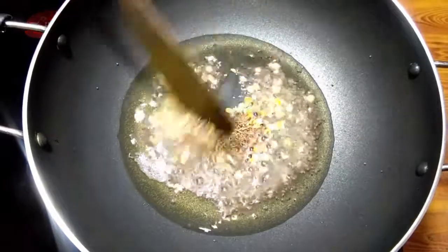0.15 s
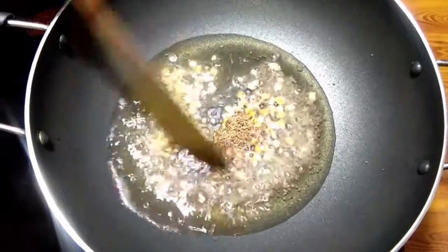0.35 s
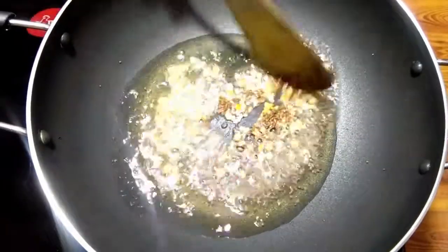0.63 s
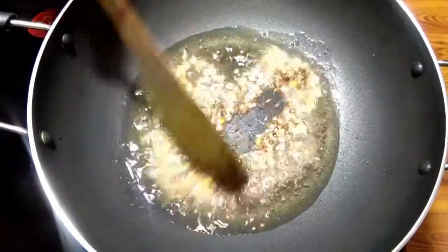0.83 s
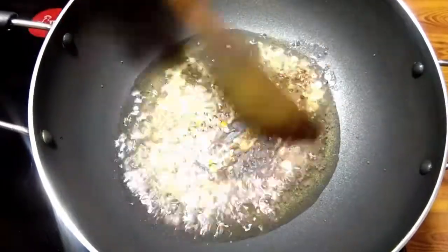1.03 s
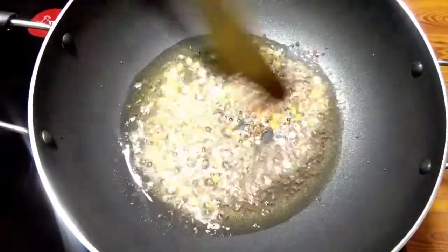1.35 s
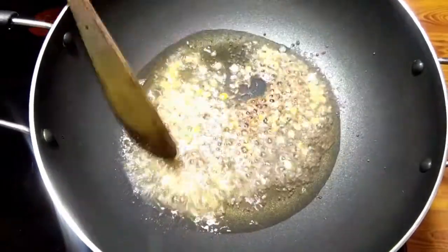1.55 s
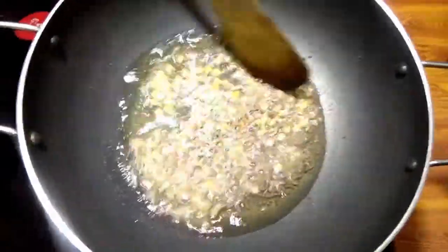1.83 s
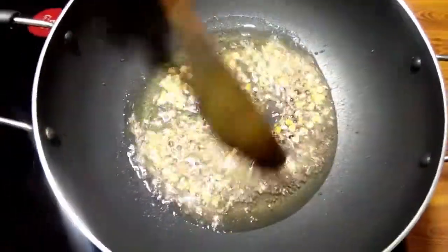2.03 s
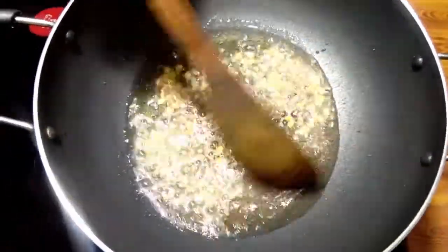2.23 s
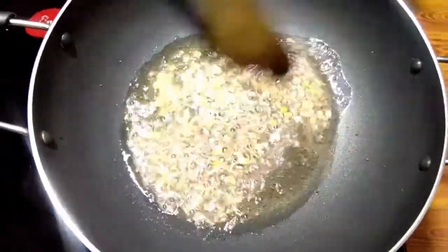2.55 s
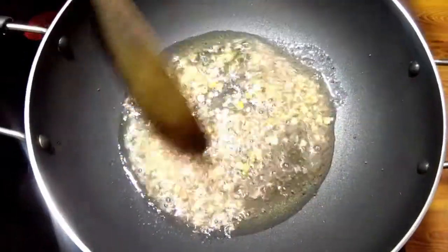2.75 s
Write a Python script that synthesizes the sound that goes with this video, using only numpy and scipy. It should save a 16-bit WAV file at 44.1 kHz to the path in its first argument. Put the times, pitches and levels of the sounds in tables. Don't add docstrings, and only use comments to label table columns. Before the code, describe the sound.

Frying seeds crackle and pop loudly over a fine sizzle, with light wooden spatula knocks on the pan

```python
import sys
import numpy as np
from scipy import signal
from scipy.fft import rfft, irfft, next_fast_len
from scipy.io import wavfile
from scipy.ndimage import map_coordinates

SR = 44100
rng = np.random.default_rng(int(sys.argv[2]) if len(sys.argv) > 2 else 0)


def voltage_ratio(decibels):
    exponent = np.asarray(decibels, float) / 20
    return 10 ** exponent


def generate_wav(signal):
    frames = np.transpose(np.atleast_2d(signal))
    scaled = np.clip(frames, -1, 1) * 32767
    pcm = np.round(scaled).astype(np.int16)
    wavfile.write(sys.argv[1], SR, pcm)


N = 127890


def unit(x):
    return x / np.sqrt(np.mean(x ** 2) + 1e-20)


def along(points, hz):
    f, v = np.transpose(points)
    return np.interp(np.log(hz + 1), np.log(f + 1), v)


def curve(rows):
    return np.interp(np.arange(N) / SR, *np.transpose(rows))


def wobble(rate):
    knots = rng.standard_normal(int(N * rate / SR) + 4)
    return map_coordinates(knots, [np.arange(N) * rate / SR])


def filtered(x, response):
    m = next_fast_len(N + SR // 2)
    spectrum = rfft(x, m) * response(np.fft.rfftfreq(m, 1 / SR))
    return irfft(spectrum, m)[:N]


def resonances(f, peaks):
    total = 0
    for k, (center, width, db) in enumerate(peaks):
        damping = 1j * f * width
        total = total + (-1) ** k * voltage_ratio(db) * damping / (center * center - f * f + damping)
    return total


def placed(s, waves):
    at = np.round(np.clip(s, 0, None) * SR).astype(int)[:, None] + np.arange(waves.shape[1])
    return np.bincount(at.ravel(), waves.ravel(), N + SR)[:N]


def swell(s, db, rise_s):
    u = np.arange(SR // 8) / SR / rise_s
    return placed(s, voltage_ratio(db)[:, None] * u * np.exp(1 - u))


def bubbles(s, gain, hz, cycles, rise_s):
    t = np.arange(260) / SR
    hz = np.clip(hz, 1500, 0.4 * SR)[:, None]
    u = t * hz / cycles
    shape = (1 - np.exp(-t / rise_s)) * np.exp(-u - u ** 2 / 2)
    shape = shape / shape.max(axis=1, keepdims=True)
    note = np.sin(2 * np.pi * hz * t * (1 + 0.0027 * u))
    return placed(s, gain[:, None] * shape * note)


def grains(per_s, hz, spread, cycles):
    r = rng.random((4000, 2))[:int(per_s * N / SR)]
    detune = rng.standard_normal(4000)[:len(r)]
    sizes_db = -8.5 * np.log(r[:, 1] + 0.05)
    pitch = hz * np.exp(spread * detune)
    return unit(bubbles(r[:, 0] * N / SR, voltage_ratio(sizes_db), pitch, cycles, rise_s=0.00011))


def pops():
    # start in seconds, peak level in dB, bubble pitch in Hz, crack level
    # over the peak in dB.
    steam_pops = [(0.085, -11.5, 2550, -26), (0.1251, -14, 3360, -8), (0.192, -19.5, 3010, -1.5),
                  (0.221, -6.5, 3340, -17), (0.285, -22.5, 2560, -14), (0.327, -13, 2470, -11),
                  (0.3465, -15, 3080, -0.5), (0.3985, -22, 5600, -6), (0.4198, -10.5, 3740, -21),
                  (0.4576, -12, 3200, -35), (0.4804, -16, 3420, -16), (0.5241, -19.5, 3300, -4),
                  (0.6491, -8, 2930, -11.5), (0.702, -11, 3220, -10.5), (0.7641, -4.5, 3920, -36),
                  (0.7667, -2.5, 3200, -30), (0.7716, -30, 3300, -10), (0.8019, -11, 3160, -4),
                  (0.8266, -10, 2430, -16.5), (0.8387, -8.5, 3440, -44), (0.8853, -9, 2710, -14.5),
                  (0.9308, -10.5, 3700, -37), (0.9755, -17, 2730, -22), (0.987, -11, 3660, -18),
                  (1.0046, -4.5, 3130, -21),
                  (1.031, -9, 3300, -16), (1.0453, -16.5, 5160, -25), (1.0533, -16.5, 3020, -11),
                 (1.087, -12.5, 3300, -21), (1.1245, -13, 3200, -16.5), (1.1456, -11.5, 2970, -18),
                 (1.1507, -19.5, 5340, -23), (1.188, -5.5, 3020, -18), (1.2028, -14, 2230, -19),
                 (1.2116, -11.5, 2860, -48), (1.268, -16, 6100, -7), (1.279, -14, 2820, -34),
                 (1.3213, -18.5, 2480, -10), (1.3464, -14, 3600, -14), (1.3814, -6.5, 2480, -15),
                 (1.3894, -11, 4030, -13.5), (1.4533, -7, 3330, -8.5), (1.5276, -6.5, 3950, -20),
                 (1.5587, -4, 3300, -24), (1.5646, -15, 2770, -31), (1.5822, -11.5, 3500, -12),
                 (1.6004, -14.5, 3100, -14.5), (1.6495, -23, 4500, -32), (1.7301, -10.5, 3670, -20),
                 (1.7473, -19.5, 2340, -22),
                  (1.7515, -22, 2900, 0.5), (1.7824, -16, 3340, 0), (1.814, -14.5, 3230, -15),
                   (1.857, -19, 2190, -21), (1.8771, -9.5, 4310, -32), (1.9263, -4, 3480, -21),
                   (2.0091, -24.5, 3200, 6.5), (2.0918, -15, 3600, -14.5), (2.1433, -15.5, 3150, 1.5),
                   (2.2031, -17, 3220, -17), (2.2301, -4, 3750, -23.5), (2.313, -8.5, 3530, -20),
                   (2.364, -24, 2200, -21), (2.3739, -15, 3860, -27), (2.3801, -12, 3350, -39),
                   (2.413, -16.5, 2600, -28), (2.4294, -14.5, 3060, -6), (2.4541, -14, 3200, -5),
                   (2.4763, -16.5, 3470, -11.5), (2.571, -17.5, 3100, -5), (2.6262, -18, 3660, -21),
                   (2.7094, -19.5, 2760, -6), (2.7463, -20, 5400, -24), (2.825, -34, 2830, 2),
                   (2.86, -22, 3680, -14)]
    # start in seconds, level in dB.
    surges = [
        (.13, -48),
        (.355, -46),
        (.66, -42),
        (0.808, -41),
        (1.015, -41),
        (1.39, -67),
        (1.792, -39.5),
    ]
    # center in Hz, width in Hz, level in dB.
    crack_color = [(3640, 4350, -0.5), (10010, 2940, 0.5), (14000, 12600, -9.5)]
    s, db, hz, crack_db = np.transpose(steam_pops)
    note = bubbles(s, voltage_ratio(db - 2), hz, cycles=3.1, rise_s=0.0002)

    t = np.arange(SR // 8) / SR
    crack_t60_s, spray_s = 0.0038, 0.046
    decay = voltage_ratio(3.5 - 60 * t / crack_t60_s) + voltage_ratio(-23) * np.exp(-t / spray_s)
    burst = placed(s, voltage_ratio(db + crack_db)[:, None] * decay)
    surge_s, surge_db = np.transpose(surges)
    burst = burst + swell(surge_s, surge_db, rise_s=0.0086) * voltage_ratio(4 * wobble(250))
    crack = filtered(burst * rng.standard_normal(N), lambda f: resonances(f, crack_color))

    spatter = swell(s, db - 33, rise_s=0.01) * grains(1350, 3300, spread=0.14, cycles=6)
    return note + crack + spatter


def small_pops():
    # start in seconds, peak level in dB, pitch in Hz.
    small_bubbles = [(0.0002, -17.5, 2620), (0.1077, -20, 2940), (0.1187, -21, 2900), (0.1754, -33, 6540),
                     (0.2202, -24, 4800), (0.244, -32, 3140), (0.2575, -26, 4570), (0.3067, -24, 2640),
                     (0.3282, -17, 3510), (0.3805, -23.5, 3010), (0.4441, -24, 2360), (0.4458, -25, 5400),
                     (0.5712, -25.5, 3900), (0.6093, -32, 4730), (0.6255, -23.5, 4000), (0.677, -24, 2650),
                     (0.7015, -23, 6700), (0.7178, -26, 2540), (0.7186, -29, 6400), (0.727, -23, 3240),
                     (0.801, -20.5, 5530), (0.8263, -18.5, 4500), (0.8386, -23, 2000), (0.8876, -26, 5920),
                     (0.9746, -30, 5230), (0.9798, -33, 5500), (1.0041, -17.5, 5560), (1.0183, -23, 2800),
                     (1.0386, -20, 3300), (1.0443, -28, 3120), (1.0517, -26, 4820), (1.2028, -20.5, 3600),
                     (1.2603, -30, 5260), (1.2628, -18, 3060), (1.2676, -22, 3480), (1.331, -30, 5600),
                     (1.3354, -25, 3100), (1.352, -26.5, 4740), (1.3634, -22, 5060), (1.3895, -23, 3050),
                     (1.3884, -24.5, 6410), (1.5291, -20, 2150), (1.5368, -19, 2970), (1.5369, -20, 5400),
                     (1.5651, -24, 2900), (1.794, -26.5, 9150), (1.8214, -22.5, 4580), (1.9188, -21, 4130),
                     (1.94, -25, 4500), (2.1431, -20.5, 9120), (2.2925, -29.5, 4800), (2.3634, -31.5, 7050),
                     (2.4157, -21, 2860), (2.509, -30.5, 7800), (2.5374, -22.5, 3560),
                     (2.7461, -23.5, 2930)]
    s, db, hz = np.transpose(small_bubbles)
    cycles = 5.5 * np.sqrt(hz[:, None] / 3000)
    return bubbles(s, voltage_ratio(db), hz, cycles, rise_s=0.0003)


def snaps():
    # start in seconds, peak level in dB.
    dry_hulls = [
        (.1254, -26),
        (.661, -20),
        (1.4532, -30),
        (1.6004, -39),
        (1.7512, -24),
        (1.7822, -6),
        (2.0088, -20),
        (2.1433, -22),
        (2.825, -22),
    ]
    # center in Hz, width in Hz, level in dB.
    snap_color = [(9300, 2000, -2), (13800, 3500, 0), (16300, 1200, 3)]
    s, db = np.transpose(dry_hulls)
    t = np.arange(400) / SR
    t60_s = 0.005
    noise = rng.standard_normal((len(s), len(t)))
    burst = placed(s, voltage_ratio(db[:, None] - 60 * t / t60_s) * noise)
    return filtered(burst, lambda f: resonances(f, snap_color))


def splits():
    # start in seconds, peak level in dB.
    split_hulls = [(0.348, -24), (0.701, -27.5), (1.0047, -16.5), (1.39, -26), (1.4535, -18), (1.749, -33),
                   (1.7836, -18), (.766, -40), (.803, -25.5), (.827, -25), (1.836, -27.5), (2.007, -34.5),
                   (2.141, -17)]
    s, db = np.transpose(split_hulls)
    push_s = 0.00031
    u = np.arange(400) / SR / push_s
    return placed(s, voltage_ratio(db)[:, None] * (1 - 0.37 * u) * np.exp(-u))


def sizzle():
    # time in seconds, frying strength in dB.
    frying = [(0, -40), (.3, -38.5), (.6, -41.5), (.82, -37.5), (1.1, -38), (1.4, -36.5), (1.66, -41),
              (2.1, -41.5), (2.36, -39), (2.6, -41), (2.9, -40)]
    # frequency in Hz, level in dB per Hz.
    hiss_color = [(700, -16), (1300, 2.5), (2170, 9.5), (3400, 11.5), (6000, 4), (9300, -2.5), (12000, -13),
                  (15000, -20)]
    hiss_flutter = voltage_ratio(1.5 * wobble(40) + wobble(8))
    crackle_flutter = voltage_ratio(2.5 * wobble(25))
    tick_flutter = voltage_ratio(2 * wobble(20))
    noise = filtered(rng.standard_normal(N), lambda f: voltage_ratio(along(hiss_color, f)))
    hiss = voltage_ratio(-4) * unit(hiss_flutter * noise)
    crackle = voltage_ratio(-6.5) * crackle_flutter * grains(1000, 3200, spread=0.22, cycles=5.0)
    ticks = voltage_ratio(-18.5) * tick_flutter * grains(1000, 9000, spread=0.23, cycles=2.7)
    return voltage_ratio(curve(frying)) * np.array([hiss, crackle + ticks])


def spatula():
    # start in seconds, level in dB, level of the
    # low modes in dB.
    pan_hits = [
        (.1068, -10.5, -4),
        (.626, -25, -40),
        (.648, -20.5, -22),
        (.676, -23, -35),
        (.838, -16.5, -25.5),
        (2.092, -26.5, -18),
        (2.35, -31, -12.5),
        (2.412, -21.5, -21),
    ]
    # frequency in Hz, level in dB, t60 in seconds.
    pan_modes = [(173, -13, 0.25), (541, -11, 0.1), (725, -3, 0.2), (767, -5, 0.1), (838, -8, .08),
                 (1236, -15, 0.12), (1360, -1, 0.1), (1400, -4, 0.09), (1478, -5, .11), (1757, -9, 0.12),
                 (1803, -9, .13), (2217, -12, .07)]
    # time in seconds, level in dB.
    strokes = [(0, -36), (.1, -51), (.3, -55.5), (.36, -54.5), (.39, -50.5), (.47, -48), (.55, -59),
               (.63, -60), (1.6, -63), (1.67, -53.5), (1.75, -60)]
    # center in Hz, width in Hz, level in dB.
    wood_modes = [(141, 68, 2), (640, 330, -5)]
    # frequency in Hz, level in dB, t60 in seconds.
    old_ring = [(563, -38, 0.32), (1300, -54, 0.5), (1696, -41, 0.57)]
    t = np.arange(SR // 3) / SR

    rings = []
    for s, db, low_db in pan_hits:
        ring = 0
        for hz, level, t60 in pan_modes:
            lowness = np.clip(np.log2(1800 / hz), 0, 1)
            ring = ring + voltage_ratio(level + low_db * lowness - 60 * t / t60) * np.sin(2 * np.pi * hz * t)
        thud = 0.8 * voltage_ratio(low_db - 60 * t / 0.0079) * np.sin(2 * np.pi * 1150 * t)
        rings.append(voltage_ratio(db) * (ring / 3 + thud))
    rings = filtered(np.array(rings), lambda f: 1j * f / (100 + 1j * f))[:, :len(t)]
    s, db, low_db = np.transpose(pan_hits)
    ringing = placed(s, rings)
    rattle_t60_s = 0.14
    rattle = placed(s, voltage_ratio((db + low_db)[:, None] - 5 - 60 * t / rattle_t60_s))

    rub = rng.standard_normal((2, N)) * voltage_ratio(1.5 * wobble(70))
    damped_modes = [(hz, 6.4 / t60, db) for hz, db, t60 in pan_modes]
    steel = unit(filtered(rub[0], lambda f: resonances(f, damped_modes)))
    wood = 1.37 * unit(filtered(rub[1], lambda f: resonances(f, wood_modes)))
    scrape = voltage_ratio(curve(strokes) - 1) * (steel + wood)

    linger = sum(voltage_ratio(level - 60 * t / t60) * np.sin(2 * np.pi * hz * t) for hz, level, t60 in old_ring)
    return np.pad(linger, (0, N - len(t))) + ringing + scrape + rattle * steel


def kitchen():
    # frequency in Hz, level in dB per Hz.
    rumble_color = [(15, -68), (25, -1), (134, 8.5), (220, -16), (368, 0.5), (476, -38), (615, -5),
                    (1500, 0), (1950, -46), (3300, -120)]
    level = voltage_ratio(-63.5 + 0.61 * wobble(8.1))
    return level * unit(filtered(rng.standard_normal(N), lambda f: voltage_ratio(along(rumble_color, f))))


def room(x):
    # frequency in Hz, t60 in seconds.
    wall_decay = [(300, 0.32), (3000, 0.18), (12000, 0.13)]
    hz, t, z = signal.stft(rng.standard_normal(SR // 2), SR, nperseg=256)
    fade = voltage_ratio(-60 * t / along(wall_decay, hz)[:, None])
    tail = signal.istft(z * fade, SR, nperseg=256)[1]
    delayed = np.pad(x, (300, 0))
    return signal.fftconvolve(delayed, tail / np.linalg.norm(tail))[:N]


def scene():
    # center in Hz, width in Hz, level in dB.
    bowl_modes = [(2540, 67, -3), (3220, 39, -5.5), (5940, 2300, 0), (9750, 2000, -6)]
    hiss, crackle = sizzle()

    def bowl(f):
        echo_s = 0.0021
        body = 1 + sum(resonances(f, [peak]) for peak in bowl_modes)
        return body * (1 + voltage_ratio(-10) * np.exp(-2j * np.pi * f * echo_s))

    bursts = filtered(pops() + small_pops() + crackle, bowl)
    near = bursts + splits() + spatula() + snaps()
    return (near + voltage_ratio(-15.5) * room(near) + hiss + kitchen())[None]


def low_pass(x):
    return signal.sosfilt(signal.butter(12, 17000, fs=SR, output="sos"), x)


def record(dry):
    bass_hz, top_hz, ceiling = 70, 15500, 0.72

    def microphone(f):
        return (1j * f / (bass_hz + 1j * f)) * (0.012 + 1 / (1 + (f / top_hz) ** 80))

    x = filtered(dry[0], microphone)
    x = x / (1 + np.abs(x / ceiling) ** 8) ** (1 / 8)
    return low_pass(x[None])


dry = scene()
out = record(dry)
generate_wav(out)
```